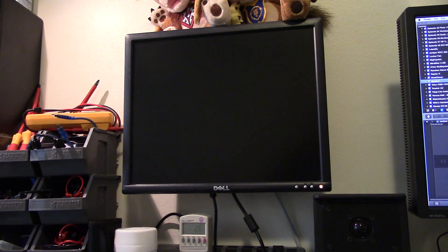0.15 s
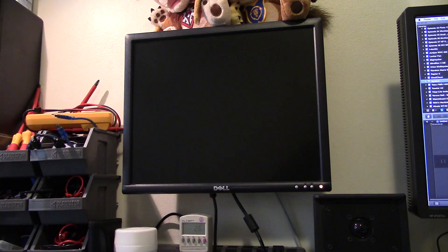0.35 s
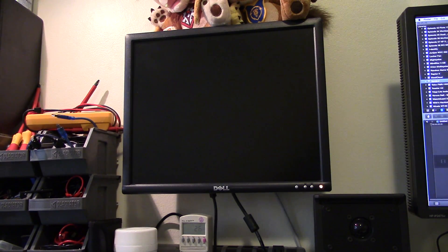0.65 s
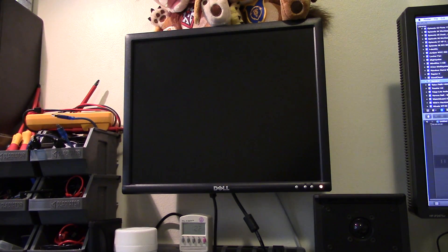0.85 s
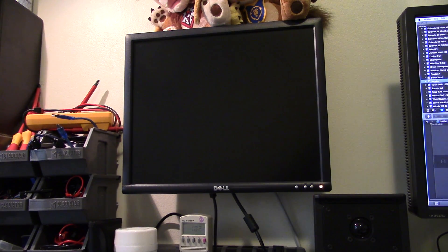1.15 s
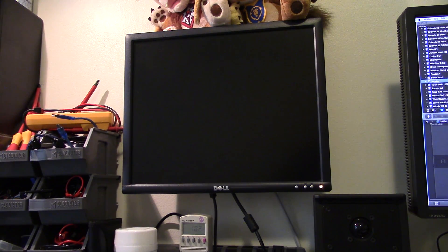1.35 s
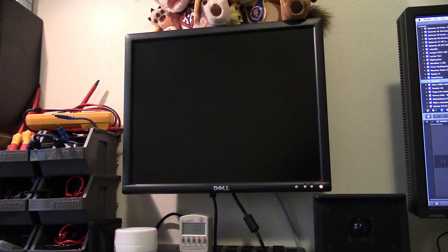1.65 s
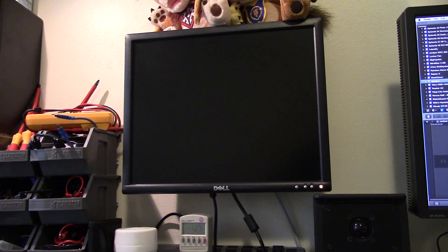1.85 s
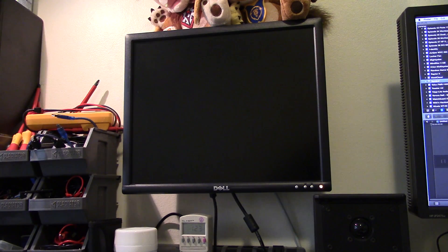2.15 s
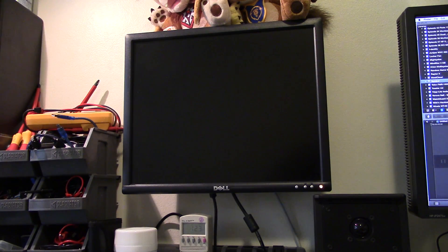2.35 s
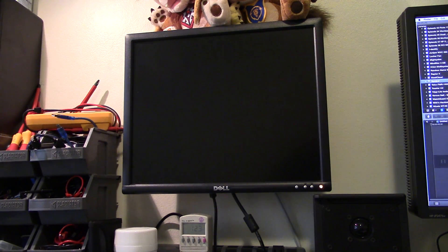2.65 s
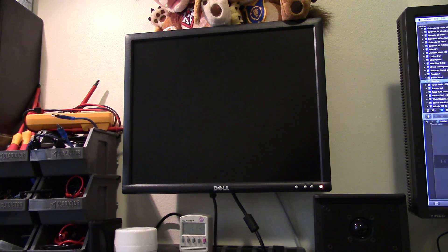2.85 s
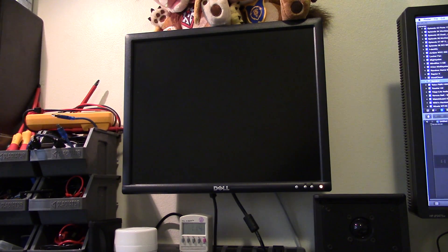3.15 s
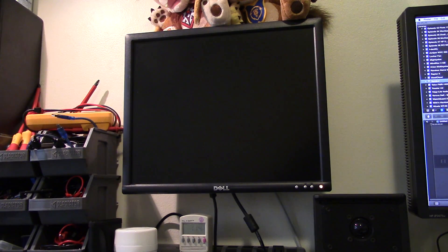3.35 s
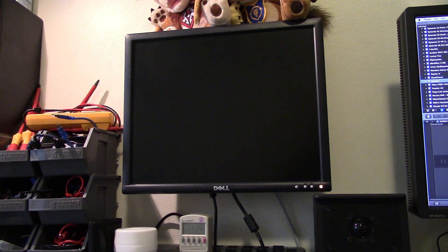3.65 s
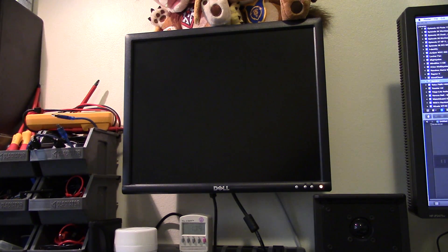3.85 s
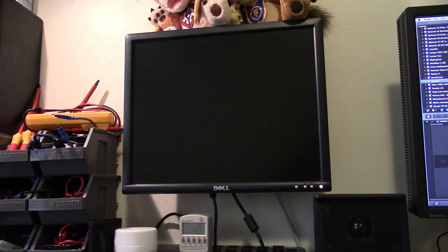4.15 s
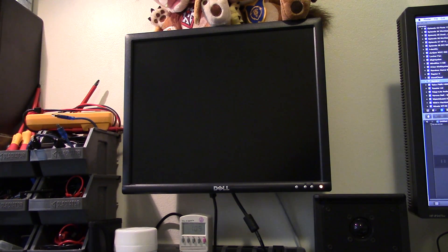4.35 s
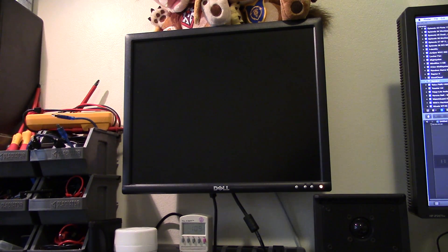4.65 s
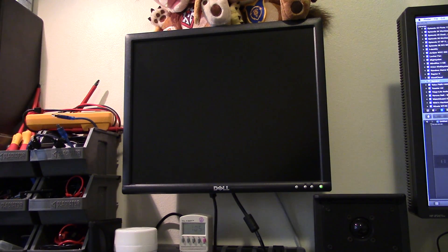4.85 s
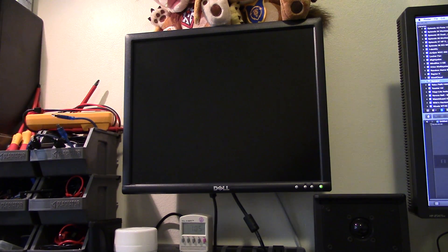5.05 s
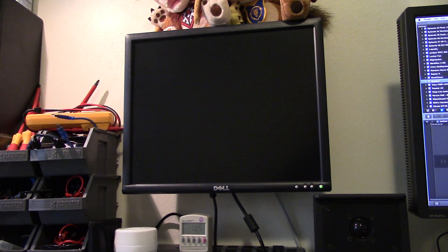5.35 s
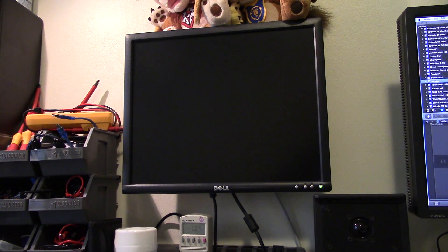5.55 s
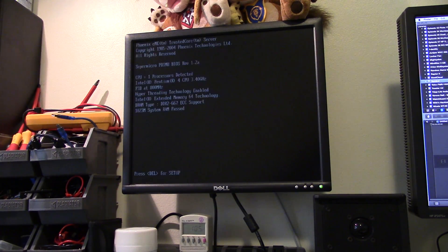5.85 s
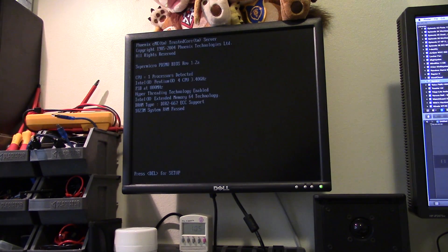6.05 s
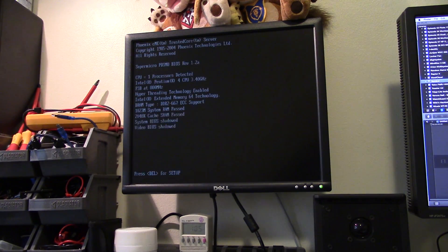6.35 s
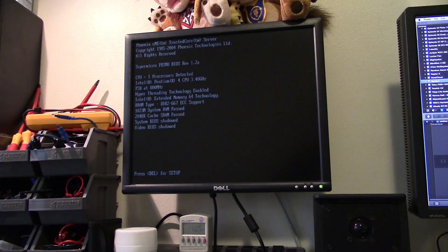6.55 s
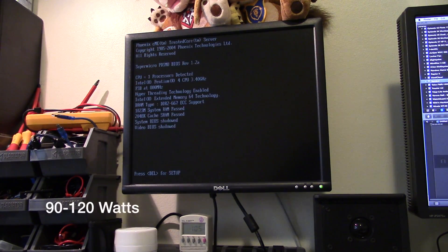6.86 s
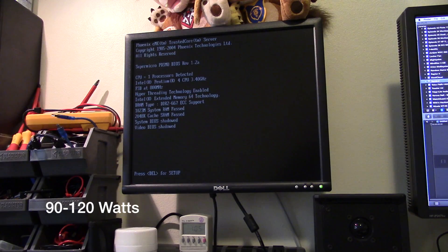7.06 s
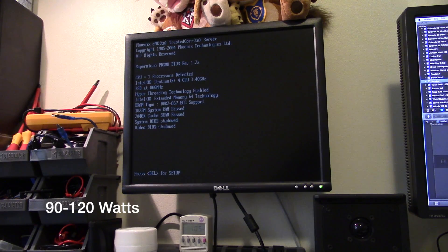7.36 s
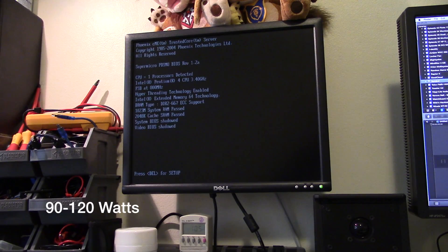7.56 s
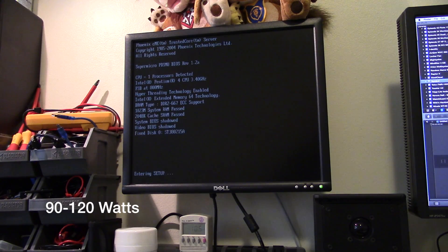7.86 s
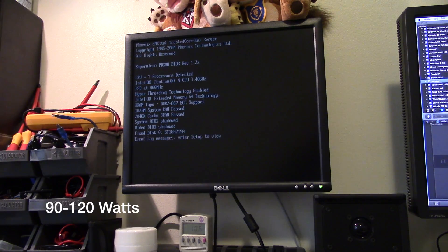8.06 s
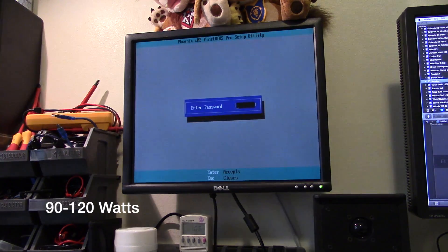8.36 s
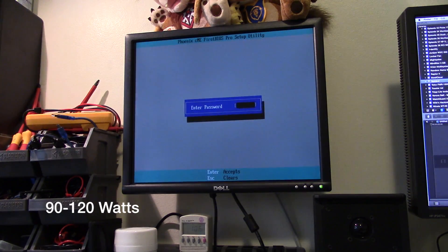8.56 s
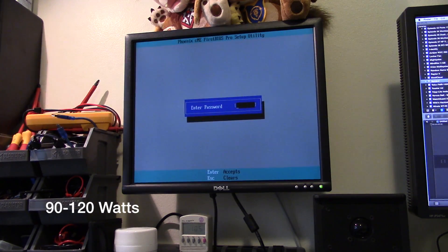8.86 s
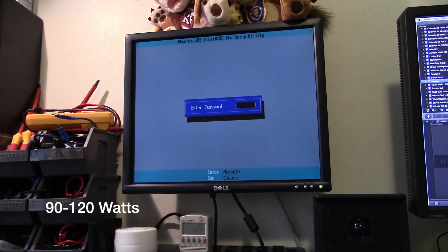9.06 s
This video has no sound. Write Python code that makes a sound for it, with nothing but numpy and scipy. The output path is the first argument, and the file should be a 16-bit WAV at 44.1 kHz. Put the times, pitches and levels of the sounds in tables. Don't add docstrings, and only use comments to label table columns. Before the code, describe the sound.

In a small room, a server's fans rev up from a quieter, duller hum to a piercing multi-toned whine wrapped in broadband airflow. The slightly mismatched rotors beat and shimmer together. The close stereo microphone drifts, so the sound dips near two and a half seconds, swells past three, then stays constant to the end; a soft low knock on its stand is nearly buried midway.

```python
import sys
import numpy as np
from scipy import signal
from scipy.fft import rfft, irfft, next_fast_len
from scipy.io import wavfile

SR = 44100
rng = np.random.default_rng(int(sys.argv[2]) if len(sys.argv) > 2 else 0)


def decibels_to_gain(level_db):
    exponent = np.asarray(level_db, float) / 20
    return 10 ** exponent


def put_to_file(sound):
    columns = np.atleast_2d(sound).T
    safe = np.clip(columns, -1, 1)
    whole_steps = np.round(safe * 32767)
    wavfile.write(sys.argv[1], SR, whole_steps.astype(np.int16))


N = 406205
STEP = 32
CONTROL_S = np.arange(N // STEP + 2) * STEP / SR


def walk(rate_hz):
    place = CONTROL_S * rate_hz
    count = int(place[-1]) + 2
    return 1.062 * np.interp(place, np.arange(count), rng.standard_normal(count))


def fine(control):
    return np.interp(np.arange(N) / STEP, np.arange(len(control)), control)


def humps(rows, x):
    return sum(size * np.exp(-((x - place) / spread) ** 2) for place, size, spread in rows)


def shape(x, points):
    size = next_fast_len(N)
    hz = np.arange(size // 2 + 1) * SR / size + 1
    point_hz, factor = np.transpose(points)
    gain = np.interp(np.log(hz), np.log(point_hz), factor)
    return irfft(rfft(x, size) * gain, size)[:N]


# centre in seconds, peak in dB, pitch in Hz, spread in seconds.
BUMPS = [
    (6.065, -57, 100, .007),
    (6.082, -48, 95, .009),
    (6.11, -60, 95, .015),
    (6.17, -67, 80, .015),
    (6.34, -68, 85, .04),
]


def bumps():
    t = np.arange(N) / SR
    out = 0
    for centre_s, peak_db, hz, spread_s in BUMPS:
        bell = np.exp(-((t - centre_s) / spread_s) ** 2)
        out += decibels_to_gain(peak_db) * np.cos(2 * np.pi * hz * (t - centre_s)) * bell
    return out


# centre in Hz, width in Hz, gain in dB.
CASE = [(413, 180, 4.5), (675, 40, 4), (801, 30, -7.5), (930, 130, 2), (1384, 158, 6), (1615, 65, 4.5),
        (2036, 84, -6), (2150, 150, 3.5), (2330, 60, -3.5), (2704, 113, 4.5), (3120, 270, 1.5),
        (4620, 170, 4), (5270, 570, 4), (7840, 420, 0.5), (92, 20, -3.5), (135, 24, 6.5)]


def case_db(hz):
    return sum(gain_db / (1 + (2 * (hz - centre) / width) ** 2) for centre, width, gain_db in CASE)


# frequency in Hz, density in dB per Hz.
RUSH = [(25, -44), (60, -42), (110, -24.5), (200, -14), (350, -6.5), (800, -1), (1200, -1.5), (2000, -1),
        (3500, -8.5), (4800, -11), (6000, -6), (10000, -19), (11500, -30), (15500, -37)]
RUSH_DB = -38.5


def air(level_db, middle_db, duct_db, rumble_db):
    size = next_fast_len(N)
    hz = np.arange(size // 2 + 1) * SR / size + 1
    rush_hz, rush_db = np.transpose(RUSH)
    colour_db = np.interp(np.log(hz), np.log(rush_hz), rush_db) + case_db(hz)
    noise = rfft(rng.standard_normal(size)) * decibels_to_gain(colour_db)
    noise *= decibels_to_gain(RUSH_DB) / np.std(irfft(noise, size))
    low, duct, mid = (1 / (1 + (hz / edge_hz) ** 8) for edge_hz in (1000, 1800, 3300))
    shares = (low, duct - low, mid - duct, 1 - mid)
    out = 0
    for share, extra_db in zip(shares, (rumble_db, duct_db, middle_db, 0 * level_db)):
        tilt_db = extra_db - np.median(extra_db)
        gust = fine(decibels_to_gain(level_db + tilt_db + 0.64 * walk(6)))
        out += irfft(noise * share, size)[:N] * gust
    return out


# frequency in Hz, level in dB relative to the air.
WALLS = [(30, -14), (100, -15), (300, -23), (700, -37), (4000, -23), (10000, -26), (15000, -6)]


def wall_air(near_db, ranges_db):
    return shape(air(near_db, *ranges_db), [(hz, decibels_to_gain(db)) for hz, db in WALLS])


# full blade-pass rate in Hz, climb in Hz/s, knee in seconds,
# knee softness in seconds, creep in Hz.
SPIN = [
    (881.6, 378, .514, .155, 35),
    (892.1, 402, .524, .117, 18.7),
    (915.6, 372, .736, .068, 12.7),
    (1289.6, 577, .71, .142, 19.6),
    (1360.4, 520, .685, .085, 70),
    (1294.1, 600, .646, .14, 27),
]
# centre in seconds, rise in Hz, spread in seconds.
SURGES = [
    (3.8, 2.2, .3),
    (4.75, -1.4, .5),
    (8.4, 2, 1.1),
]
CREEP_S, HUNT_HZ, HUNT_PER_S = .85, .35, 3


def speeds():
    rates = []
    for full_hz, climb, knee_s, soft_s, creep_hz in SPIN:
        shortfall = climb * soft_s * np.logaddexp(0, (knee_s - CONTROL_S) / soft_s)
        creep = creep_hz * np.exp(-CONTROL_S / CREEP_S)
        rates.append(full_hz - shortfall - creep + HUNT_HZ * walk(HUNT_PER_S))
    rates[0] += humps(SURGES, CONTROL_S)
    return np.array(rates)


def slowness(hz):
    return np.clip((1 - hz / hz[-1] - .03) / .12, 0, 1)


# centre in Hz, width in Hz, gain in dB.
STANDING = [(660, 50, 8.5), (813, 13, -7), (835, 16, 1), (1125, 60, -7), (1241, 24, -2.5), (1336, 20.5, 9),
            (1347.7, 4, 7), (1660, 120, 12), (2113, 55, 8)]


def standing_db(hz):
    return sum(gain_db * np.exp(-((hz - centre) / width) ** 2) for centre, width, gain_db in STANDING)


def tone(hz, level_db, flutter_db, wobble_rad):
    turns = np.cumsum(hz) * STEP / SR + rng.random()
    phase = 2 * np.pi * turns + wobble_rad * walk(25)
    strength = np.sqrt(2) * decibels_to_gain(level_db + flutter_db * walk(14))
    return fine(strength) * np.sin(fine(phase))


# full-speed level in dB, early run-up extra in dB.
BLADES = [(-46, 6), (-42.5, 2.5), (-40, -4.5), (-40.5, -12), (-41, 0.5), (-49, 8.5)]
# centre in seconds, size in dB, spread in seconds.
SWELLS = [
    (1.35, 6, 0.42),
    (1.83, -14, 0.041),
    (2.3, -2, 0.37),
    (2.87, -10, .07),
    (3.32, 8, 0.095),
    (3.75, 5, 0.11),
    (7.8, -4, .8),
]
MEETING_DB = -53.5


def blade_tones(hz, near_db):
    out = 0
    swell_db = humps(SWELLS, CONTROL_S)
    for k, (rate, (full_db, runup_db)) in enumerate(zip(hz, BLADES)):
        level_db = full_db + near_db + runup_db * slowness(rate) + standing_db(rate)
        if k in (3, 5):
            level_db = level_db + swell_db
        out += tone(rate, level_db, .7, .15)
    meeting_hz = hz[2] + hz[5]
    out += tone(meeting_hz, MEETING_DB + 0.75 * near_db + standing_db(meeting_hz), 2.1, .3)
    return out


FRONT_BLADES, REAR_BLADES = 5, 7
FRONT_ORDER = [1, 0, 0, 4, 0, 8, 0, 10, 5, 0, 15, 10, 20, 15, 10, 15]
REAR_ORDER = [0, 1, 2, 0, 4, 0, 8, 0, 7, 14, 0, 7, 0, 7, 14, 14]
# one fan, full-speed levels of those tones in dB.
ORDER_DB = [
    [-68, -70, -64, -75, -66, -75, -62, -61, -72, -61, -54, -60, -73, -64, -71, -78],
    [-68, -62, -72, -59, -61, -51, -75, -52, -61, -72, -57, -61, -69, -66, -78, -78],
    [-71, -73, -68, -75, -70, -75, -69, -51, -90, -58, -59, -60, -76, -69, -72, -63],
]
# one fan, early run-up extras of those tones in dB, from other resonances met on the way.
RUNUP_DB = [
    [4, 4, 0, 0, 0, 0, 0, 13, 12, 0, -4, 0, 0, 0, 0, 0],
    [-2, -4, 0, 13, 0, 3, 0, 4, 6, 0, 3, 0, 0, 0, 0, 0],
    [0, 0, 0, 0, 0, 0, 0, -4, 0, 3, 0, 2, 0, 0, 0, -8],
]


def shaft_tones(hz, near_db):
    out = 0
    front_hz, rear_hz = hz[:3] / FRONT_BLADES, hz[3:] / REAR_BLADES
    for front, rear, levels, extras in zip(front_hz, rear_hz, ORDER_DB, RUNUP_DB):
        slow = slowness(front)
        for m, n, full_db, runup_db in zip(FRONT_ORDER, REAR_ORDER, levels, extras):
            out += tone(m * front + n * rear, full_db + near_db + runup_db * slow, 1.63, 0.33)
    return out


# frequency in Hz, share of the left-right drift followed.
AIM = [(100, 0), (500, .5), (1300, .95), (2500, .9), (4000, 1), (8000, 1.7), (13000, 2.4)]
# frequency in Hz, left minus right in dB.
PORTS = [(60, -.6), (200, -.4), (700, 0), (1300, .4), (2400, .4), (5000, .2), (7000, 0), (8500, 1.2),
         (11000, .5)]


def port_difference(fans, bump, pan_db):
    aim = fine(np.tanh(pan_db * np.log(10) / 40)) * shape(fans, AIM)
    mismatch = [(hz, db * np.log(10) / 40) for hz, db in PORTS]
    return aim + shape(fans + bump, mismatch)


# time in seconds, hiss level in dB, left minus right in dB.
MIC = [(0.0, -59.5, -2), (0.02, -59.5, 0.5), (0.49, -51, 0.0), (0.67, -45.5, 4.0), (0.92, -43, 2.5),
       (1.46, -43, 2.0), (2.2, -46.5, 2.5), (2.46, -47, 2), (2.82, -41.5, 1.0), (3.28, -37, 0.5),
       (4.33, -41, 0.5), (4.85, -44, 0.0), (8.18, -44, 0.5), (9.21, -44, 0.0)]
STEADY_HISS_DB = -44.5
# early run-up extras of middle, duct ring and rumble in dB.
DULL_DB = (4.5, 4.5, 5.5)


def scene():
    time_s, hiss_db, pan_db = np.transpose(MIC)
    near_db = np.interp(CONTROL_S, time_s, hiss_db) - STEADY_HISS_DB
    pan_db = np.interp(CONTROL_S, time_s, pan_db)
    hz = speeds()
    ranges_db = [db * slowness(hz[1]) for db in DULL_DB]
    fans = blade_tones(hz, near_db) + shaft_tones(hz, near_db) + air(near_db, *ranges_db)
    bump = bumps()
    side = port_difference(fans, bump, pan_db) + wall_air(near_db, ranges_db)
    return fans + bump + side * np.array([[1], [-1]])


def roll_off(x):
    return signal.sosfilt(signal.butter(12, 15640, fs=SR, output="sos"), x)


def record(dry):
    return roll_off(dry)


dry = scene()
out = record(dry)
put_to_file(out)
```